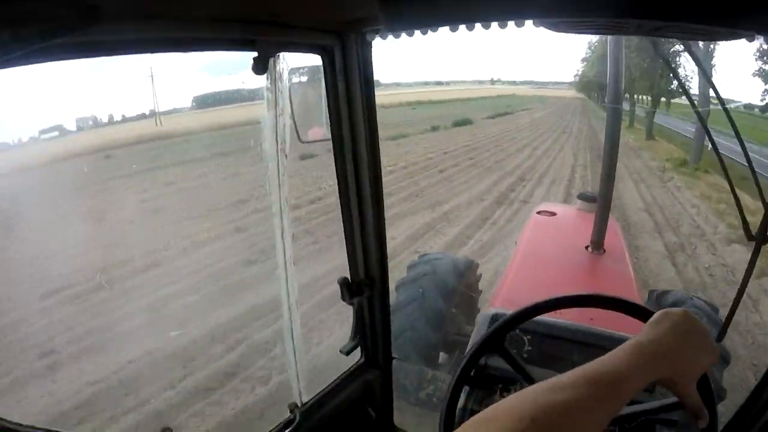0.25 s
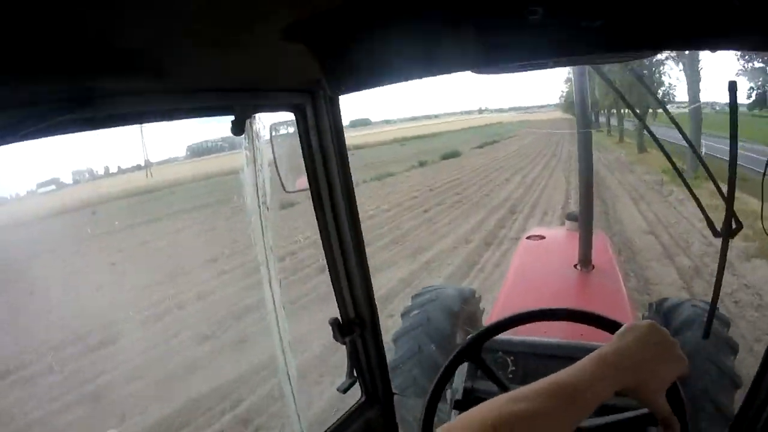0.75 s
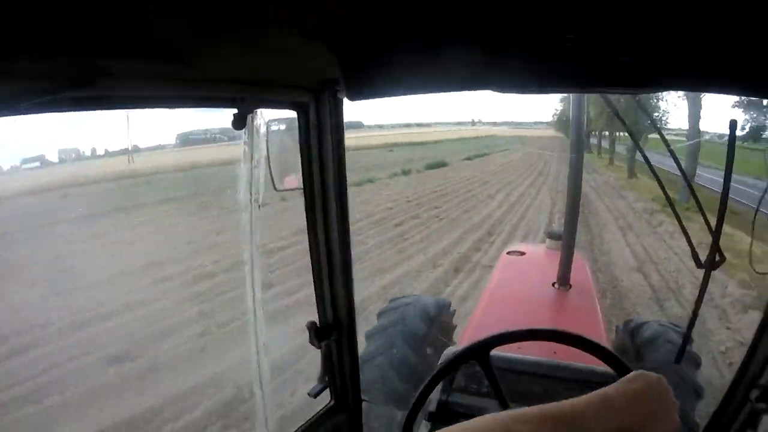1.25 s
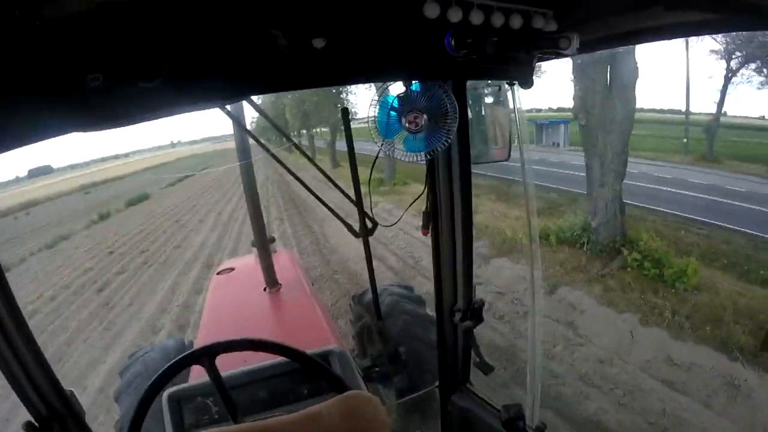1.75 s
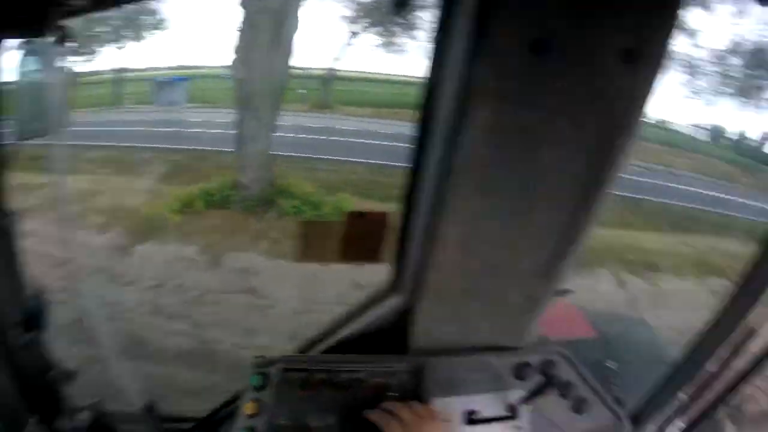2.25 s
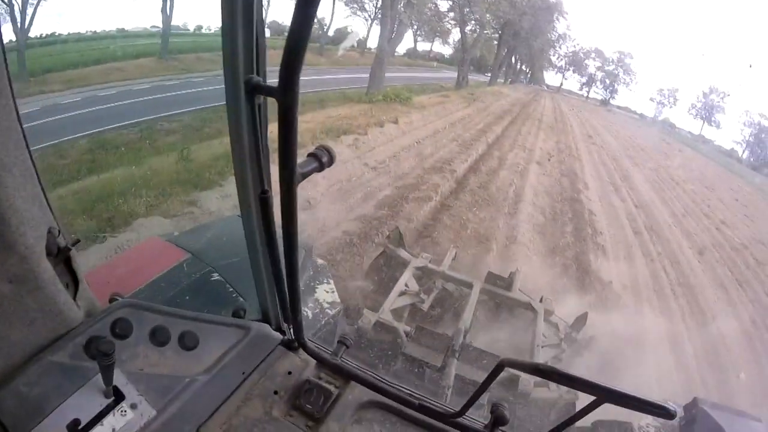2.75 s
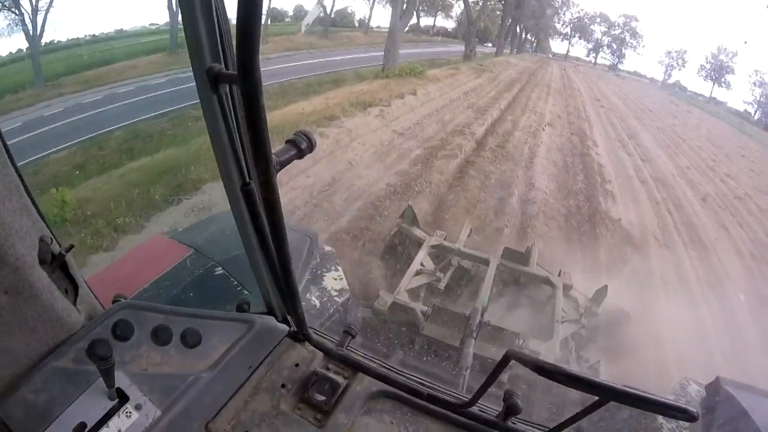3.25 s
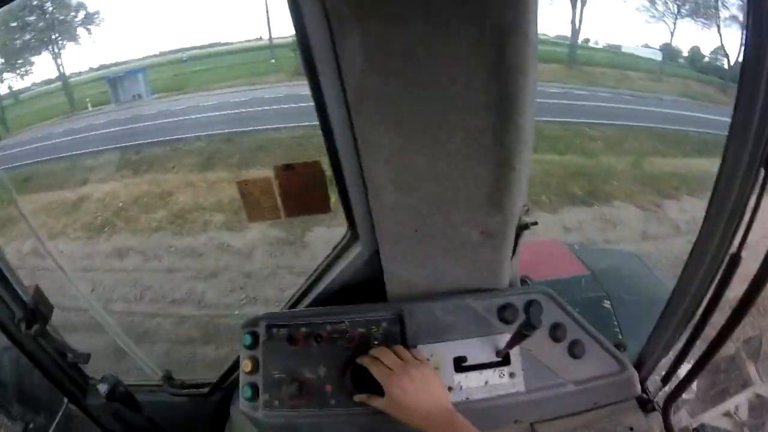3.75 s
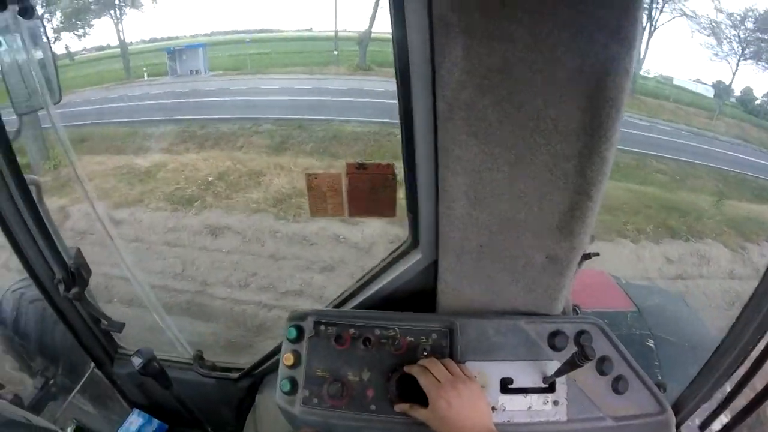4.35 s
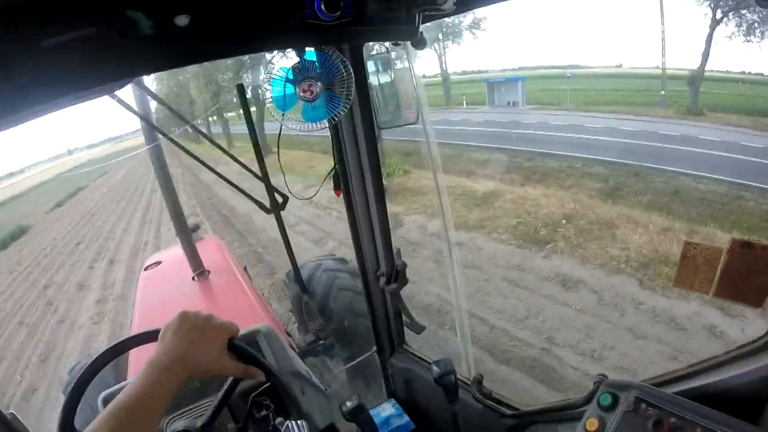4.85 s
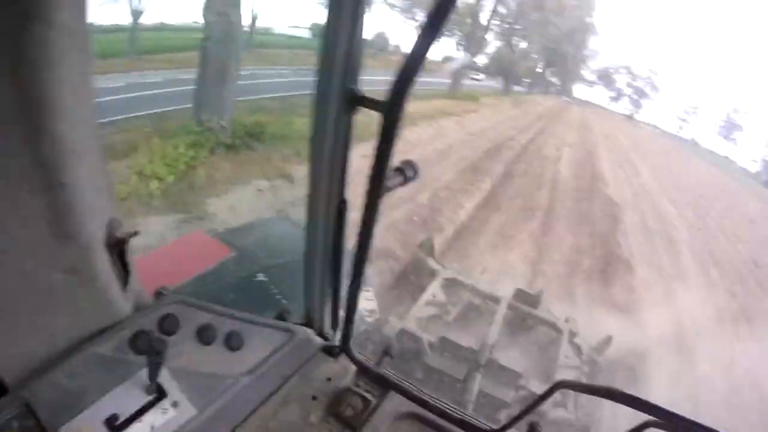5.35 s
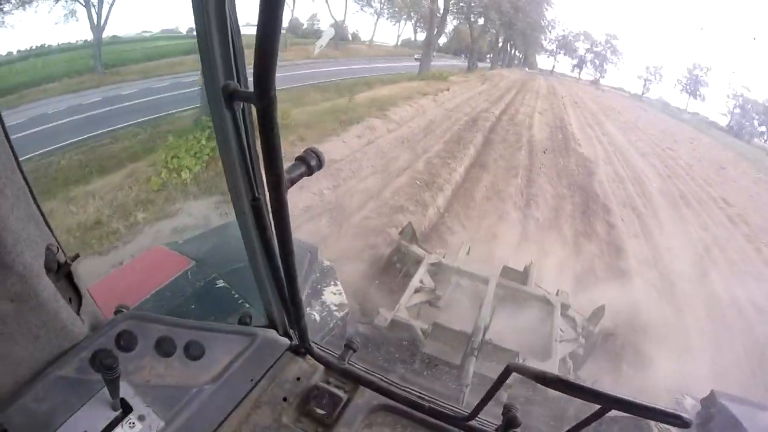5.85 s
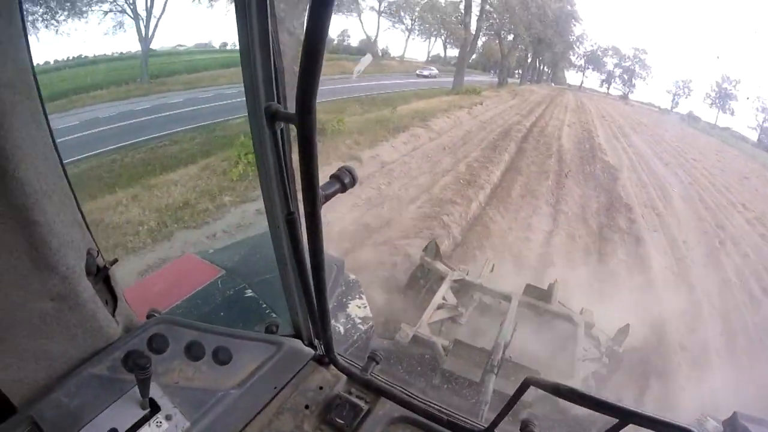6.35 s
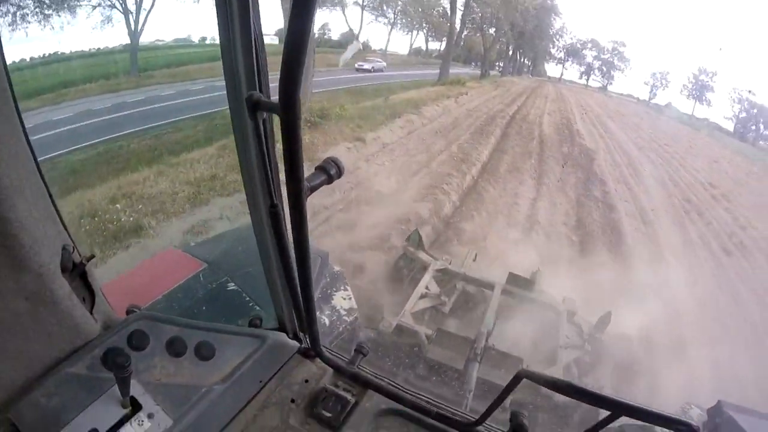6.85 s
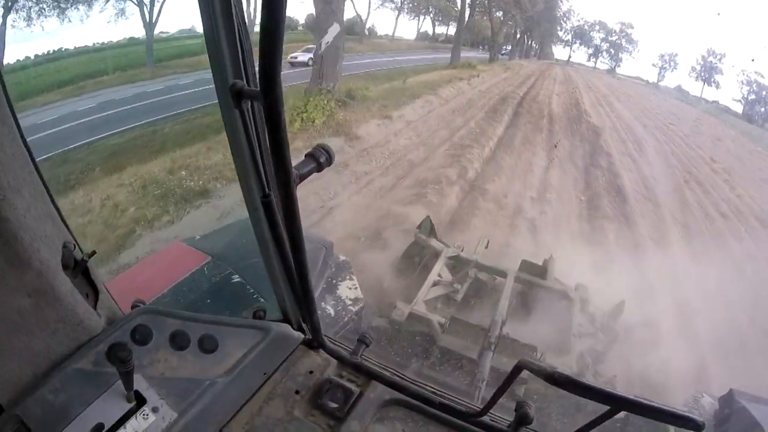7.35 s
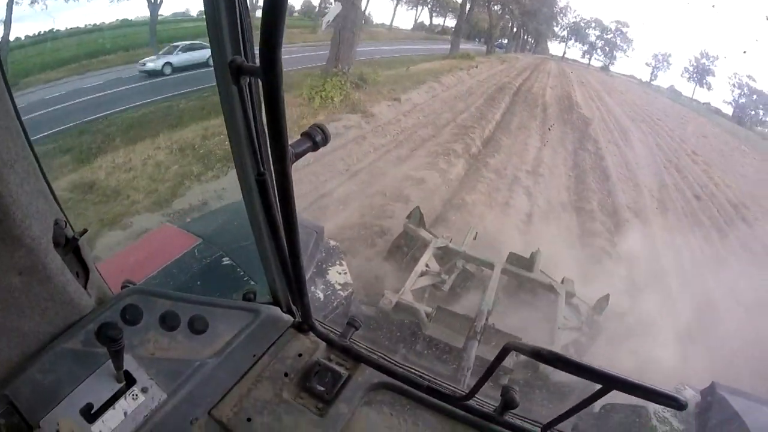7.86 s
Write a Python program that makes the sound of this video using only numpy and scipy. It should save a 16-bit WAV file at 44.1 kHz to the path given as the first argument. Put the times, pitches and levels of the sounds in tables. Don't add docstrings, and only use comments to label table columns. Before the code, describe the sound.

From 0 seconds, a diesel tractor already works at steady speed, heard by a small head-worn microphone inside the cab. Low engine hum, rapid knocks and lightly pulsing hiss blend with pump and gear whines, muffled panel roar and deep tyre rumble that swells unevenly with bumps. Fine harrow jingle and faint airy hiss lie above. Tiny cab chinks appear from about 1 second. Near 1.7 to 2.5 the head turns sideways then rearward, shifting the tonal balance and easing the pump whine; the first clanks ring around 2.6, with sharper ones near 3.4. From 3.6 the driver faces sideways again, and the high drive gear sings intermittently, strongest around 4.5 to 5.6. After 5.4 the rear view returns; the singing fades apart from a brief flicker near 7.3. Drawbar and tines clank irregularly but often from 5.8 to 7.8, the engine unchanged until the end at about 8.

```python
import sys
import numpy as np
from scipy import signal
from scipy.fft import rfft, irfft
from scipy.io import wavfile
from scipy.ndimage import uniform_filter1d

SR = 44100
rng = np.random.default_rng(int(sys.argv[2]) if len(sys.argv) > 2 else 0)


def file_out(sig):
    cols = np.atleast_2d(sig).T
    lim = np.clip(cols, -1, 1)
    pcm = np.round(lim * 32767).astype(np.int16)
    wavfile.write(sys.argv[1], SR, pcm)


def level_to_linear(level):
    exponent = np.asarray(level, float) / 20
    return 10 ** exponent


N = 357210
TIME = np.arange(N) / SR

# time in seconds, pitch in Hz.
DRIVE_GEAR_PITCH = [(0, 1757), (.35, 1747), (.65, 1756), (1.3, 1757), (1.6, 1745), (1.8, 1768), (2.1, 1756),
                    (2.9, 1762), (3.35, 1753), (3.6, 1764), (4.15, 1758), (4.6, 1768), (4.85, 1761),
                    (5.35, 1771), (5.85, 1774), (6.05, 1763), (6.7, 1759), (8.1, 1762)]
# time in seconds, angle in degrees right of the bonnet.
GAZE = [(0, -4), (1.62, 4), (1.8, 37), (2.28, 22.5), (2.55, 149), (3.5, 156), (3.8, 88), (4.3, 87),
        (4.5, 53), (5.15, 54), (5.4, 143), (8.1, 150)]
CAB_PATHS = [(30, 0), (50, 1), (90, 1), (150, 2)]
# level in dB facing bonnet, side, rear.
HUM = [(-67, -74.5, -74), (-59, -60.5, -65), (-56, -56.5, -54.5), (-76, -65, -66), (-66.5, -65, -70),
       (-71, -64, -60), (-61, -59, -62), (-68, -83, -65), (-58, -59, -59.5), (-65, -62.5, -76),
       (-65.5, -76, -82), (-64, -60.5, -65.5), (-78.5, -73, -71), (-73.5, -63.5, -68), (-70, -66.5, -65.5),
       (-72.5, -65.5, -67.5), (-80.5, -80.5, -80), (-70, -67.5, -62.5), (-82, -76.5, -70.5),
       (-75.5, -74.5, -67), (-80, -71.5, -67), (-71, -76.5, -78.5), (-70, -78.5, -71.5),
       (-64.5, -69.5, -72), (-76.5, -86, -89.5), (-78, -89, -76.5), (-79, -84.5, -82.5),
       (-73.5, -86, -81.5), (-77.5, -88.5, -80.5), (-70.5, -74.5, -74)]
LINE_ORDERS = [14.33, 28.65, 32, 33, 36, 38, 57, 58, 61, 63, 66, 75, 76, 85, 87, 91, 101, 104, 108, 117,
               123, 139, 156, 160, 196, 208]
# level in dB facing bonnet, side, rear.
LINE_LEVELS = [(-68, -65, -65), (-66.5, -68, -69), (-76, -68.5, -90.5), (-75.5, -85, -81.5),
               (-77.5, -72.5, -76.5), (-67.5, -64, -65.5), (-68, -68.5, -70.5), (-64, -77, -68.5),
               (-82.5, -84.5, -81), (-91.5, -98, -71.5), (-92, -86, -74.5), (-85, -98, -87.5),
               (-80.5, -80.5, -77), (-95, -75, -77.5), (-86.5, -90, -88), (-97, -89.5, -91.5),
               (-90, -79.5, -88.5), (-78.5, -76.5, -78.5), (-77, -87, -87), (-78.5, -79, -83),
               (-82.5, -84, -87.5), (-87.5, -79.5, -85), (-83, -78.5, -81), (-84, -83, -87.5),
               (-82.5, -96.5, -96), (-94, -85.5, -87.5)]
WHINE_ORDERS = (22.92, 52, 146.05)
# gaze in degrees, pump level in dB, timing gear level in dB.
WHINE_LEVELS = [(0, -56, -58), (29.6, -56.5, -60), (50, -61, -69), (92, -66.5, -60), (151, -70.5, -58)]
# start in seconds, length in seconds, level in dB.
DRIVE_GEAR_SPELLS = [(0, 0.28, -67.5), (.29, .22, -67), (.53, 0.31, -68), (.8, .64, -65), (1.44, 0.11, -69),
                     (1.76, 0.17, -67), (2.12, 0.11, -68), (2.24, 0.16, -62.5), (2.44, 0.13, -65),
                     (2.8, .17, -71), (3.15, 0.39, -74), (3.57, 0.46, -64.5), (3.97, 0.28, -70),
                     (4.31, 0.076, -66), (4.41, 0.068, -63), (4.55, .3, -60), (4.85, 0.39, -64),
                     (5.26, 0.15, -63.5), (5.41, 0.3, -64), (5.72, .25, -74), (6.12, .2, -72),
                     (7.28, 0.041, -60.5), (7.4, .66, -74)]
# frequency in Hz, level in dB.
KNOCK_TONE = [(250, -23), (400, -7), (690, 1.5), (900, -10.5), (1200, -12.5), (1600, -14.5), (2000, -11),
              (2400, -21), (2800, -28.5), (3500, -49)]
# start in seconds, level in dB, length in ms, frame thud in dB.
CLANKS = [(2.598, -73.5, 53, -66), (2.652, -72.5, 10, -76), (3.112, -74.5, 40, -67), (3.353, -67.5, 7, -72),
          (3.394, -65.5, 7, -67), (4.329, -74, 8, -70), (4.415, -70, 6, -69), (5.827, -71, 3.03, -59),
          (6.153, -74, 8, -63), (6.319, -84, 9, -76), (6.437, -64, 3, -72), (6.507, -73, 14, -69),
          (6.579, -67.5, 4, -74), (6.666, -68.5, 14, -59), (6.973, -67, 6, -72), (7.134, -69, 5, -68),
          (7.284, -66, 4, -70), (7.303, -67, 22, -63.5), (7.421, -66.5, 6, -74), (7.698, -73, 10, -72),
          (7.763, -76, 35, -73)]
# start in seconds, level in dB, length in ms, pitch in Hz.
CHINKS = [(0.988, -78, 12, 8594), (1.463, -75.5, 8, 9800), (1.562, -79, 8, 7600), (1.869, -75, 9, 7600),
          (2.111, -73.5, 12, 7150), (3.06, -81, 8, 6386), (3.775, -75, 8, 5300), (3.93, -86, 5, 10500),
          (3.969, -80, 8, 7115), (4.251, -77, 11, 5700), (4.678, -71.5, 9, 6210), (5.136, -74, 8, 5900),
          (5.424, -78, 41, 7804), (5.99, -80, 10, 5300), (6.31, -85, 9, 9000), (5.639, -72.5, 13, 7170),
          (5.66, -72, 25, 5293), (6.002, -76, 7, 5700), (6.124, -73, 13, 6660), (6.261, -74, 5, 5290),
          (6.381, -81, 8, 7146), (7.16, -79, 7, 5698), (7.849, -80, 10, 6398)]
# frequency in Hz, width in Hz, level in dB.
FRAME_MODES = [(1665, 370, 6), (2110, 290, -0.5), (2650, 920, -15)]
# frequency in Hz, width in Hz, level in dB.
DRAWBAR_MODES = [(3000, 300, -2.5), (3660, 660, 3), (4240, 310, 2.5)]
# frequency in Hz, width in Hz, level in dB.
FITTING_MODES = [(5700, 1700, -1), (7600, 1800, -6.5), (10000, 1800, -9.5), (12300, 2400, -14)]
# frequency in Hz, level in dB.
JINGLE_TONE = [(1800, -28), (2600, -7.5), (3100, -1), (3650, 0.5), (3950, -2), (4350, 1.5), (4550, -3.5),
               (4800, -8), (5600, -15), (7000, -22.5), (9000, -39)]
# frequency in Hz, level in dB.
AIR_TONE = [(3500, -27), (4800, -1), (5500, 0), (7000, -5.5), (9000, -9.5), (11000, -14.5), (13000, -19),
            (15500, -29)]
# start in seconds, length in seconds, level in dB.
BUMPS = [(0.231, 0.115, -56), (0.403, 0.13, -44), (0.788, 0.175, -48.5), (1.033, 0.053, -42),
         (1.179, 0.044, -50), (1.305, 0.075, -46), (1.538, 0.26, -47), (2.104, 0.17, -50),
         (2.36, 0.51, -46), (2.786, 0.06, -57), (2.939, 0.17, -45), (3.364, 0.21, -42),
         (3.691, 0.196, -48.5), (3.957, 0.22, -45), (4.363, 0.19, -51), (4.693, 0.048, -50),
         (4.837, 0.066, -45), (4.957, 0.067, -48), (5.19, 0.05, -46.5), (5.434, 0.045, -49.5),
         (5.545, 0.19, -46), (5.914, 0.043, -49), (6.036, 0.305, -49), (6.371, 0.2, -52.5),
         (6.675, 0.043, -49), (6.842, 0.73, -47.5), (7.57, 0.22, -48), (7.98, 0.051, -52)]
# frequency in Hz, level in dB.
RUMBLE_TONE = [(6, -30), (11, -9), (15, 2), (20, 1), (29, 1), (38, -2), (47, -16), (75, -30)]
# frequency in Hz, level in dB.
ROAR_TONE = [(35, -20), (55, -11), (100, 3.5), (150, -2.5), (200, -4), (270, -4.5), (310, -13.5),
             (450, -7.5), (560, -8), (690, -7.5), (850, -14), (1200, -36.5)]
# frequency in Hz, level in dB.
HISS_TONE = [(700, -15), (950, -1), (1300, -1.5), (1550, -2.5), (2050, 1), (2400, -5), (2750, -20),
             (3300, -28.5), (4500, -36)]
HISS_DB = (-64.5, -65.5, -65.5)
JINGLE_DB = (-80, -81, -77.5)
AIR_DB = (-86, -86.5, -86)


def hum_and_gears(cycles, shares, bounce_db):
    orders = [*range(1, len(HUM) + 1), *LINE_ORDERS]
    slow = TIME[::256]
    out = np.zeros(N)
    for order, view_db in zip(orders, [*HUM, *LINE_LEVELS]):
        level_db = np.array(view_db) @ shares[:, ::256]
        level_db += 1.65 * drift(rate_hz=4 + .08 * order, t=slow)
        if order < 4:
            level_db += 0.55 * bounce_db[::256]
        sway = .45 * rng.random()
        sway += 0.044 * drift(rate_hz=3, t=slow)
        sway += 0.0041 * min(order, 70) * drift(rate_hz=14, t=slow)
        phase = order * cycles + np.interp(TIME, slow, sway)
        out += np.interp(TIME, slow, level_to_linear(level_db)) * np.cos(2 * np.pi * phase)
    return np.sqrt(2) * out


def whines(cycles):
    twisted = cycles - 0.00015 * np.sin(4 * np.pi * cycles)
    pump_db = by_gaze(WHINE_LEVELS, axis=1)
    timing_db = by_gaze(WHINE_LEVELS, axis=2)
    drive_db = spells(DRIVE_GEAR_SPELLS, rest_db=-78.5, fade_s=.09)
    out = np.zeros(N)
    for order, level_db in zip(WHINE_ORDERS, (pump_db, timing_db, drive_db)):
        level = level_to_linear(level_db + 1.4 * drift(rate_hz=16) + .9 * drift(rate_hz=6))
        level *= 1 + 0.19 * np.cos(4 * np.pi * cycles)
        out += level * np.cos(2 * np.pi * (order * twisted + 0.033 * drift(rate_hz=22)))
    return np.sqrt(2) * out


def blows(turn):
    at, strength = rng.random((12, 2)).T
    at = (np.arange(12) + .7 * at) / 12
    return sum(level_to_linear(8.4 * s) * np.exp(-((turn - a) % 1) / 0.077) for a, s in zip(at, strength))


def knocks(cycles, shares):
    size = 4096
    loudness = evened(blows(np.arange(size) / size))
    cycle_hz = DRIVE_GEAR_PITCH[0][1] / WHINE_ORDERS[2]
    colour = level_to_linear(read(KNOCK_TONE, np.arange(size // 2 + 1) * cycle_hz))
    paths = irfft(rfft(loudness * rng.standard_normal((3, size))) * colour)
    place = cycles % 1 * size
    heard = np.zeros(N)
    for share, path in zip(shares, paths):
        heard += np.sqrt(share) * np.interp(place, np.arange(size), path)
    return level_to_linear(-64) * evened(heard), np.interp(place, np.arange(size), loudness)


def rattles():
    out = np.zeros(N + SR)
    t = np.arange(4096) / SR
    # start, thud dB, clank dB, chink dB, length ms, chink Hz
    jolts = [(s, db - 2, db + 3, db, ms, hz) for s, db, ms, hz in CHINKS]
    jolts += [(s, thud_db, db, db - 13, ms, 5900) for s, db, ms, thud_db in CLANKS]
    for s, thud_db, clank_db, chink_db, ms, chink_hz in jolts:
        shake, stretch = rng.standard_normal((3, len(t))), rng.uniform(0.966, 1.05)
        shake *= level_to_linear(1.6 * np.repeat(rng.standard_normal(len(t) // 64), 64))
        shape = np.minimum(t / .003, 1)
        shape *= np.exp(-np.maximum(t - 0.00046 * ms, 0) / 0.012)
        fittings = [(1.04 * chink_hz, 1200, -5), *FITTING_MODES]
        sound = level_to_linear(thud_db) * ring(shake[0], FRAME_MODES, stretch)
        sound += level_to_linear(clank_db) * ring(shake[1], DRAWBAR_MODES, stretch)
        sound += level_to_linear(chink_db) * ring(shake[2], fittings, stretch=0.936)
        out[round(s * SR):][:len(t)] += shape * sound
    return out[:N]


def harrow(shares):
    jolts = (rng.random(N) < 30 / SR) * level_to_linear(2.4 * rng.exponential(1, N))
    flare = signal.lfilter([1], [1, -np.exp(-1 / (.011 * SR))], jolts)
    jingle = noise(JINGLE_TONE, patchy_db=0.9, ripple_db=.9, size=256)
    air = noise(AIR_TONE, patchy_db=1.1, ripple_db=0.8, size=512)
    jingle *= level_to_linear(JINGLE_DB @ shares) * (1 + 0.3 * flare)
    return jingle + level_to_linear(AIR_DB @ shares) * air * (1 + 0.22 * flare)


def ground_rumble(bounce_db):
    return level_to_linear(-53 + 0.69 * bounce_db) * noise(RUMBLE_TONE, patchy_db=0.0, ripple_db=3.5, size=8192)


def cab_roar(bounce_db):
    level_db = -54.5 + .05 * bounce_db + 0.56 * drift(rate_hz=3)
    return level_to_linear(level_db) * noise(ROAR_TONE, patchy_db=1.75, ripple_db=0.4, size=4096)


def engine_hiss(shares, loudness):
    level = level_to_linear(HISS_DB @ shares + 0.65 * drift(rate_hz=3.7)) * (0.73 + 0.16 * loudness)
    return level * noise(HISS_TONE, patchy_db=1.0, ripple_db=2.5, size=1024)


def noise(spectrum, patchy_db, ripple_db, size):
    hz, frames = np.fft.rfftfreq(size, 1 / SR), 4 * N // size + 5
    a, b, patches = rng.standard_normal((frames, len(hz), 3)).T
    patches = uniform_filter1d(patches, size=8, axis=0)
    patches = evened(uniform_filter1d(patches, size=8, axis=1))
    ripples = evened(uniform_filter1d(rng.standard_normal((len(hz), 3)), size=5, axis=0))
    frame_starts = np.minimum(np.arange(frames) * size // 4, N - 1)
    ripples = ripples @ facing()[:, frame_starts]
    level_db = read(spectrum, hz)[:, None] + patchy_db * patches + ripple_db * ripples
    z = (a + 1j * b) * level_to_linear(level_db)
    return evened(signal.istft(z, nperseg=size, noverlap=3 * size // 4)[1][:N])


def ring(x, modes, stretch):
    out = np.zeros(len(x))
    for hz, width_hz, db in modes:
        r = np.exp(-np.pi * width_hz / SR)
        poles = [1, -2 * r * np.cos(2 * np.pi * hz * stretch / SR), r * r]
        once = signal.lfilter([1, 0, -1], poles, x)
        out += level_to_linear(db) * evened(signal.lfilter([1, 0, -1], poles, once))
    return evened(out)


def facing():
    return np.clip(1 - abs(by_gaze(CAB_PATHS, axis=1) - np.arange(3)[:, None]), 0, 1)


def by_gaze(rows, axis):
    return np.interp(curve(GAZE, axis=1), [r[0] for r in rows], [r[axis] for r in rows])


def spells(rows, rest_db, fade_s):
    level_db = np.full(N, float(rest_db))
    for start, length, db in rows:
        level_db[round(start * SR):round((start + length) * SR)] = db
    return uniform_filter1d(level_db, max(round(fade_s * SR), 1))


def curve(rows, axis):
    return np.interp(TIME, [r[0] for r in rows], [r[axis] for r in rows])


def drift(rate_hz, t=TIME):
    knots = np.clip(rng.standard_normal(400), -1.7, 1.7)
    return np.interp(t * rate_hz, np.arange(len(knots)), knots) * 1.394


def read(points, hz):
    f, value = np.transpose(points)
    return np.interp(np.log(hz + 1), np.log(f + 1), value, left=-120, right=-120)


def evened(x):
    return x / np.sqrt(np.mean(x ** 2) + 1e-20)


def scene():
    cycle_hz = curve(DRIVE_GEAR_PITCH, axis=1) / WHINE_ORDERS[2]
    cycle_hz *= 1 + .0013 * drift(rate_hz=12)
    cycles = np.cumsum(cycle_hz) / SR
    shares = facing()
    bounce_db = spells(BUMPS, rest_db=-55, fade_s=0.055) + 51.5
    knock, loudness = knocks(cycles, shares)
    engine = hum_and_gears(cycles, shares, bounce_db) + whines(cycles) + knock
    metal = rattles() + harrow(shares)
    background = ground_rumble(bounce_db) + cab_roar(bounce_db) + engine_hiss(shares, loudness)
    return (engine + metal + background)[None]


def roll_off(x):
    return signal.sosfilt(signal.butter(12, 15700, fs=SR, output="sos"), x)


def record(dry):
    faded = dry * signal.windows.tukey(N, 200 / N)
    mix = faded + level_to_linear(-115) * rng.standard_normal(dry.shape)
    return roll_off(mix)


dry = scene()
out = record(dry)
file_out(out)
```